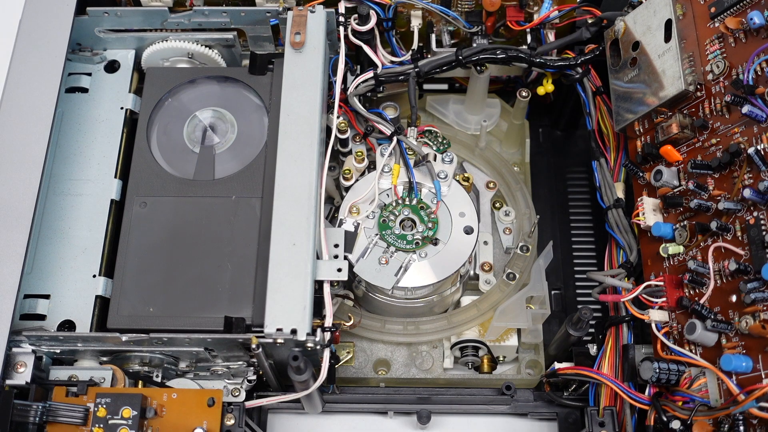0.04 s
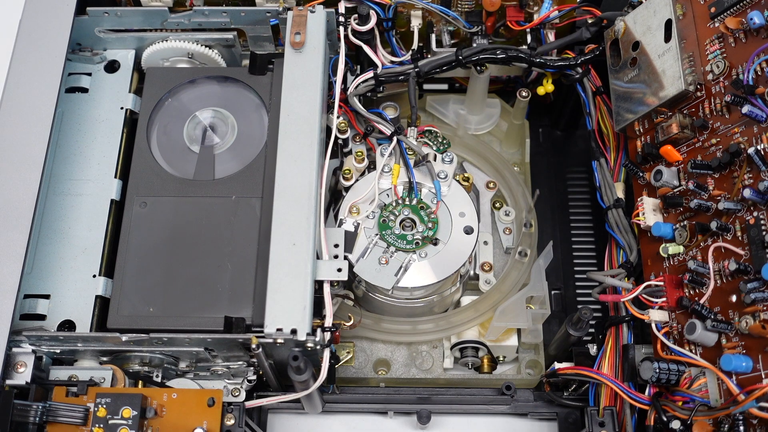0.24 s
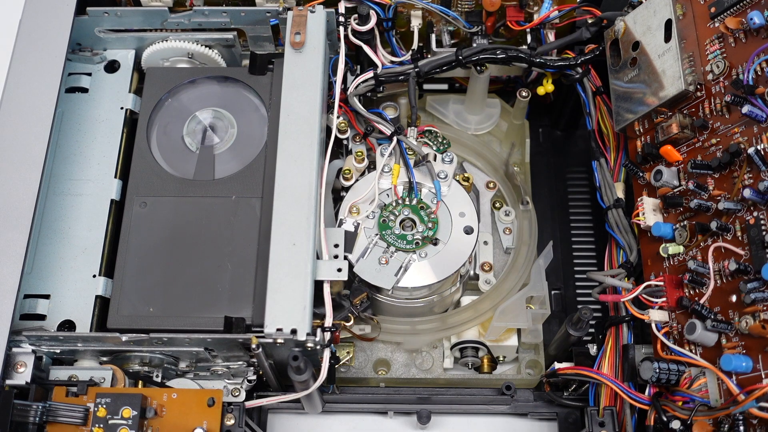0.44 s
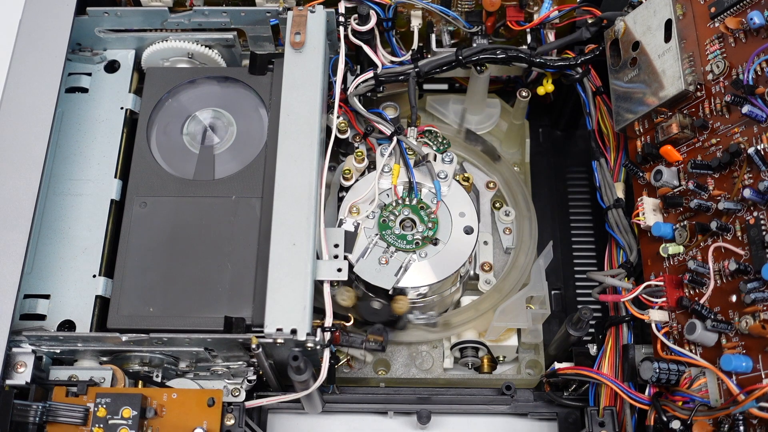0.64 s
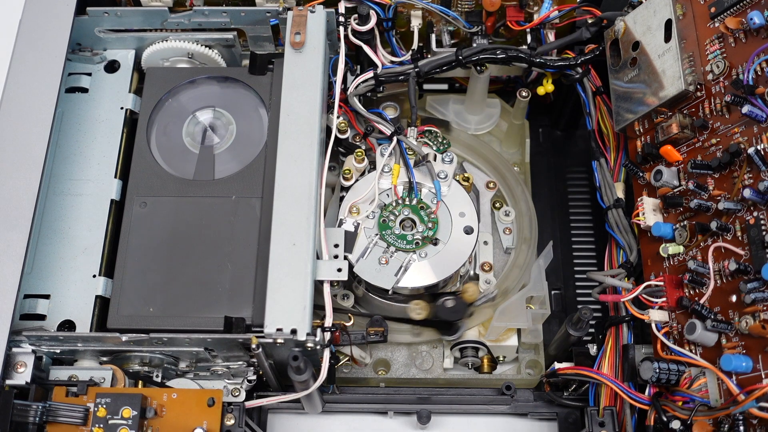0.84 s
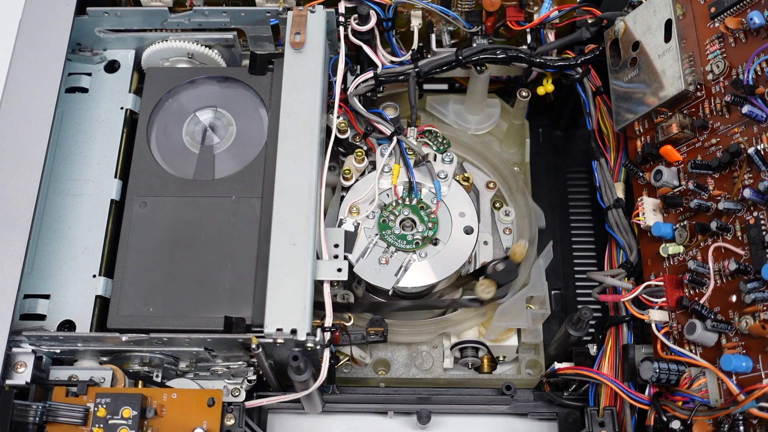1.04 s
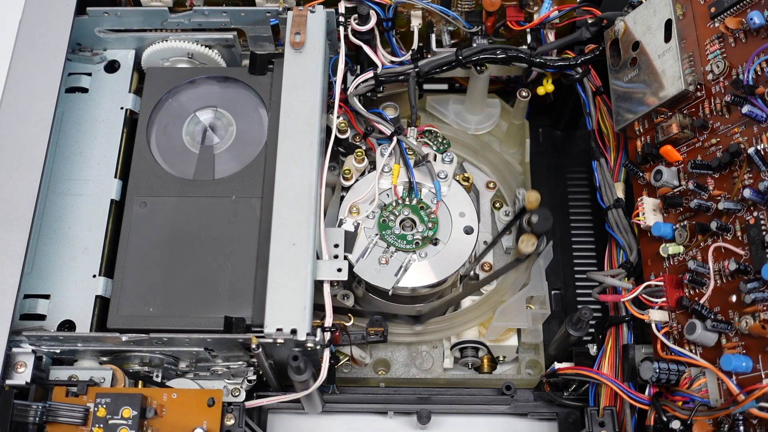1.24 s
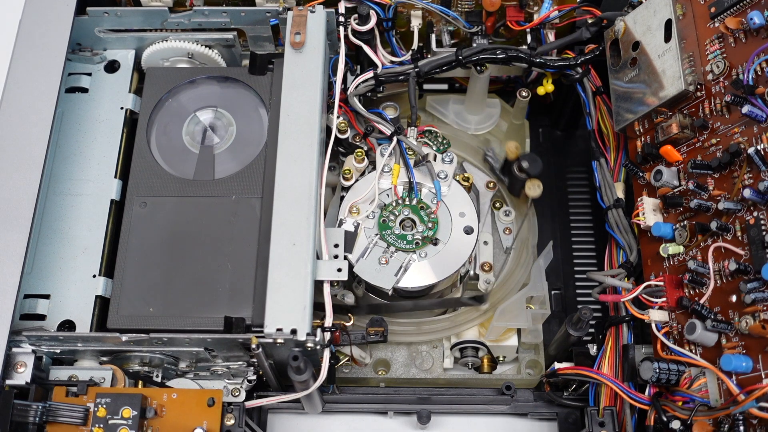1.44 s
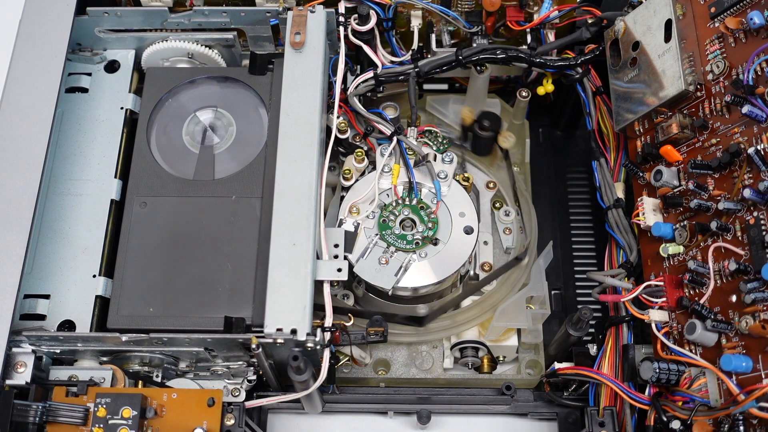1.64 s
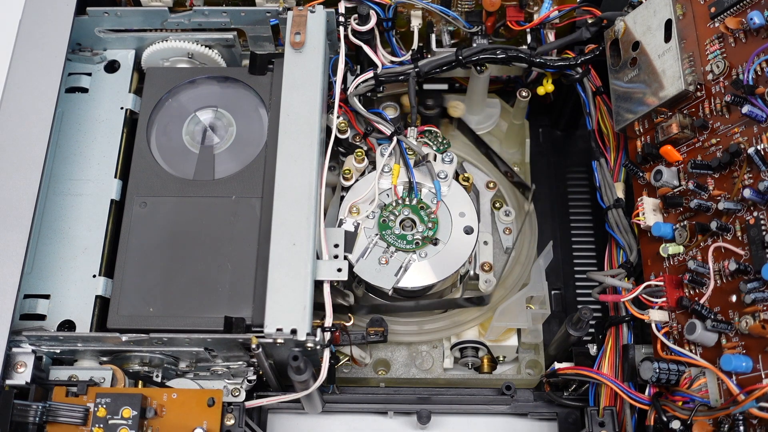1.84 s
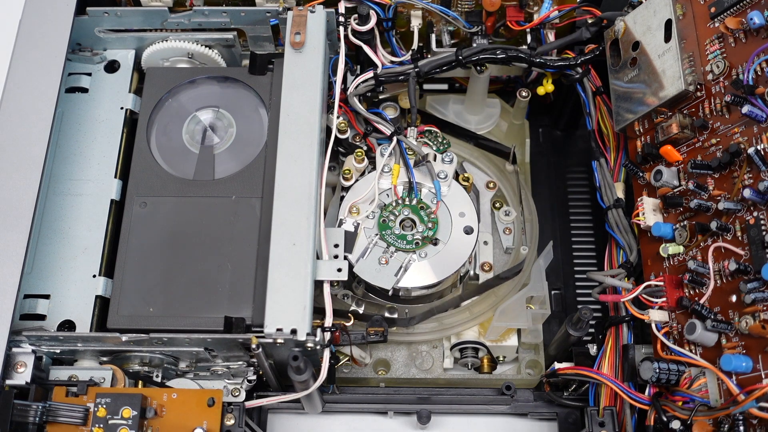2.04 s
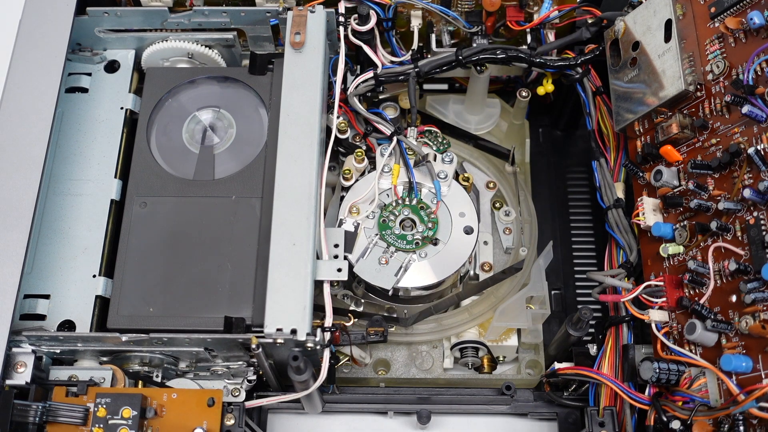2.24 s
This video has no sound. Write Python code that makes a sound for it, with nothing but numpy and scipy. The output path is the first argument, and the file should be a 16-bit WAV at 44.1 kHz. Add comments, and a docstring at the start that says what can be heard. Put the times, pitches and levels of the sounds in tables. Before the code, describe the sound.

A small motor whirs, rattles and clicks as a video recorder threads its tape.

```python
"""A video recorder threads its tape

Heard from close above the open case, a small motor and a slower belt-driven gear shaft whir at
harmonics of their rotation rates. The loading ring rattles round and levers click, exciting the
resonances of the chassis. The guides latch, the motor stops, and the head drum hums on under a
thin, steady electronic whistle."""
import sys
import numpy as np
from scipy import signal
from scipy.fft import rfft, irfft
from scipy.io import wavfile

SR = 44100
rng = np.random.default_rng(int(sys.argv[2]) if len(sys.argv) > 2 else 0)


def digitize_waveform(pressure):
    """Quantize a signal to 16-bit integers and store it at the path in sys.argv[1].

    Rows of a 2-D input are taken as channels; values are limited to [-1, 1].
    """
    field = np.atleast_2d(pressure).T
    bounded = np.clip(field, -1, 1)
    quanta = np.round(bounded * 32767).astype(np.int16)
    wavfile.write(sys.argv[1], SR, quanta)


N = 105840
TIME = np.arange(N) / SR
START_S, STOP_S = .155, 2.11  # motor on, motor off


def amp(db):
    """Amplitude ratio of a level in decibels."""
    return 10 ** (np.asarray(db) / 20)

def unit(x):
    """Normalisation to rms 1."""
    return x / np.sqrt(np.mean(abs(x) ** 2) + 1e-20)

def curve(points):
    """Linear interpolation in time."""
    return np.interp(TIME, *np.transpose(points))

def spectrum(points, hz):
    """Interpolation of level over log frequency."""
    f, db = np.transpose(points)
    return np.interp(np.log(hz + 1), np.log(f + 1), db)

def add(mix, s, sound):
    """Superposition of a sound starting at s seconds."""
    part = mix[max(round(s * SR), 0):][:len(sound)]
    part += sound[:len(part)]

def drift(hz):
    """Random fluctuation: low-pass noise of rms 1."""
    f = np.fft.rfftfreq(N, 1 / SR)
    return unit(irfft(rfft(rng.standard_normal(N)) / (1 + (f / hz) ** 4), N))

def colour(x, db_at, size=4096):
    """Minimum-phase filter with the gain db_at(f)."""
    log_gain = np.log(amp(db_at(abs(np.fft.fftfreq(size, 1 / SR)))))
    taps = np.fft.ifft(np.exp(np.conj(signal.hilbert(log_gain)))).real
    return signal.fftconvolve(x, taps)[:len(x)]

def noise(points):
    """Gaussian noise of a given spectral shape, rms 1."""
    return unit(colour(rng.standard_normal(N), lambda f: spectrum(points, f)))

def resonate(x, hz, width_hz):
    """Forced response of two equal resonators in cascade, rms 1."""
    r = np.exp(-np.pi * abs(width_hz) / SR)
    pole = [1, -r * np.exp(2j * np.pi * hz / SR)]
    return unit(signal.lfilter([1 - r], pole, signal.lfilter([1 - r], pole, x)).real)


# room noise spectrum (f/Hz, relative level/dB)
ROOM = [(18, -51), (30, -31), (145, 1), (411, -1.5), (503, -0.5), (1160, -2.5), (2430, -7.5),
        (13000, -19.5)]

def room():
    """Ambient noise: faint, stationary and broadband."""
    return amp(-80.5) * noise(ROOM)


# envelope of the running mechanism (t/s, level/dB)
EFFORT = [(0,-60),(.14,-49),(.175,-21),(.205,-4.5),(.25,0),(.33,-1.5),(.42,-0.5),(.62,-0.5),(.9,0.5),(1.1,.5),(1.35,-.7),(1.6,-0.7),(1.85,0.5),(1.97,0),(2.07,2),(2.11,-5.5),(2.16,-9),(2.21,-14),(2.3,-17.5),(2.4,-24)]

def effort():
    """Amplitude envelope: the mechanism starts, runs and dies away."""
    return amp(curve(EFFORT))


# envelope of the whistle (t/s, gain/dB)
WHISTLE_SWELL = [(0,-8.5),(.3,0),(1,2.5),(1.9,2),(2.15,3),(2.4,8)]

def whistle(line_hz=15690, interaural_rad=2.94):
    """A tone at the picture line rate; random modulation deepens while parts move."""
    moving = .25 + np.minimum(effort(), 1)
    ears = []
    for db, depth, lag in ((-64, .3, 0), (-56.5, .1, interaural_rad)):
        waver = 1 + depth * moving * (drift(6.9) + 1j * drift(30))
        carrier = np.exp(1j * (2 * np.pi * line_hz * TIME - lag))
        ears.append(amp(db + curve(WHISTLE_SWELL)) * np.sqrt(2) * (waver * carrier).real)
    return np.array(ears)


# tones of the head drum (f/Hz, bandwidth/Hz, level/dB)
DRUM_TONES = [(274.4,35,-75.5),(915,74,-70),(1166,25.7,-65.5),(2710,40,-68),(6210,90,-80),(7000,35,-80),(8670,130,-70),(10500,60,-78)]
# spectrum of the air round it (f/Hz, relative level/dB)
DRUM_AIR = [(35, -76), (60, -42), (269, -18.5), (619, -33.5), (1150, 2.5), (1790, -26.5), (2470, -29),
            (2780, 4.5), (3050, -23.5), (8820, -16), (15000, -22)]

def head_drum(rise_s=.8):
    """Narrow-band hum and air noise grow as the drum spins up, then hold."""
    tones = sum(amp(db) * resonate(rng.standard_normal(N), hz, width) for hz, width, db in DRUM_TONES)
    air = amp(-63) * noise(DRUM_AIR)
    return np.clip((TIME - START_S) / rise_s, 0, 1) * (tones + air)


# blows on the case (t/s, gain/dB)
THUMPS = [(2.06,-55),(2.117,-58),(2.226,-64.5)]
# modes of the case (f/Hz, bandwidth/Hz, level/dB, T60/s)
CASE_MODES = [(131,50,-5.5,0.21),(200,60,-1.5,.2),(271.5,53,-2.5,0.36),(364,78,-1.5,0.43),(654,95,-1.5,0.32),(1012,140,3,.35)]

def thumps():
    """Modal decay: the case rumbles briefly as the guides seat."""
    out = np.zeros(N)
    for s, gain_db in THUMPS:
        ring = sum(amp(db - 60 * TIME / t60) * resonate(rng.standard_normal(N), hz, width)
                   for hz, width, db, t60 in CASE_MODES)
        add(out, s, amp(gain_db) * ring)
    return out


# friction spectrum (f/Hz, relative level/dB)
FRICTION = [(40,-44),(110,-16),(300,-3),(480,-7),(750,4.5),(1500,1),(3000,0),(5000,1),(7500,-2),(11000,-1.5),(13500,-11),(16000,-17.5)]
# scrapes (centre t/s, half length/s, level/dB, squeak f/Hz, relative squeak level/dB)
SCRAPES = [(.209,0.0029,-40,4350,8),(.994,.004,-39.5,2170,7),(1.254,.003,-49,9440,5),(1.762,0.0034,-34.5,8760,3),(2.2015,0.0025,-49,1250,13),(2.228,0.0086,-45.5,7520,-13),(2.266,0.0063,-55,1390,7)]

def scrapes():
    """Sliding friction: noise and a resonant squeak swell and fade in a Gaussian envelope."""
    out = np.zeros(N)
    for s, half_s, db, squeak_hz, squeak_db in SCRAPES:
        rub = noise(FRICTION)
        squeak = amp(squeak_db) * resonate(rng.standard_normal(N), squeak_hz, width_hz=550)
        out += amp(db) * unit(rub + squeak) * np.exp(-.5 * ((TIME - s) / half_s) ** 2)
    return out


# peaks and dips of the chassis response (f/Hz, bandwidth/Hz, gain/dB)
CHASSIS = [(880,50,-0.5),(1062,48,4),(1183,49,-0.5),(1330,100,0.5),(1537,50,5.5),(1727,57,5.5),(2145,30,5),(2460,26,1.5),(2710,95,3.5),(3240,50,0.5),(6010,48,0.5),(8720,290,3.5),(10840,190,2),(13400,200,-18)]

def chassis(force, shape, size=4096):
    """Source and filter: chassis resonances colour a force given a spectral shape; rms 1."""
    def response_db(f):
        lift = sum(db / (1 + (2 * (f - hz) / width) ** 2) for hz, width, db in CHASSIS)
        return spectrum(shape, f) + lift
    return unit(colour(force, response_db, size))


# low, middle and high spectra of an impact (f/Hz, relative level/dB)
KNOCK = [(40,-62),(120,-25.5),(300,-22.5),(470,-18),(650,-4),(1080,-0.5),(1300,-5.5),(1800,-28.5)]
CLACK = [(500,-35),(1100,-18.5),(1500,0),(3000,0),(5500,-3.5),(7500,-27.5)]
SNAP = [(3500,-34.5),(6300,6),(11000,-1),(13000,-9),(16000,-14)]
# lever and guide impacts; knock, snap and ring are relative to the clack
# (t/s, level/dB, knock/dB, snap/dB, rise/s, T60/s, ring f/Hz, ring/dB)
CLICKS = [(0.2049, -40.5, -4, -8, 0.0005, 0.11, 4440, -4.5),
          (0.2237, -42.5, -6, -5, 0.0074, 0.09, 1710, -16),
          (0.2626, -38.5, -10, -11, 0.0014, 0.061, 2905, -4.5),
          (0.2966, -41.5, 5.5, 0.5, 0.0033, 0.033, 870, 1),
          (0.3474, -41.5, -4, -1, 0.001, 0.086, 1760, -12),
          (0.4743, -41, -2.5, -15, 0.001, 0.093, 1540, -3.5),
          (0.4815, -49, 0, 1.5, 0.0014, 0.031, 1040, -1),
          (0.5253, -43.2, -1, 2.5, 0.0025, 0.047, 6780, -1.5),
          (0.5438, -40.5, -7, -9, 0.00055, 0.065, 1750, -19),
          (0.6214, -39, -6.5, -4.5, 0.0006, 0.086, 1660, -11),
          (0.6526, -44.5, 0.5, 2.5, 0.0007, 0.036, 1620, 0.5),
          (0.6642, -41.5, -2.5, 0.5, 0.004, 0.051, 1734, -12),
          (0.672, -41.5, -17, -4, 0.0038, 0.014, 1730, -19), (0.7068, -54, 8.5, 3, 0.0006, 0.076, 1096, 0),
          (0.7304, -42.5, -5.5, -4, 0.0025, 0.038, 1173, -10),
          (0.767, -44.5, 1, -2, 0.0013, 0.33, 1720, -15), (0.7885, -47, -10, 4, 0.00065, 0.029, 2700, 4),
          (0.8526, -41.3, -6, 1, 0.0034, 0.035, 2708, -9),
          (0.9874, -35.5, -12, -3.5, 0.0004, 0.17, 1704, -7),
          (1.0041, -57, 9, -5, 0.0011, 0.059, 1090, -12), (1.2904, -41.5, -5, -2, 0.0012, 0.064, 1545, -6),
          (1.714, -30.5, -13.5, -7, 0.00076, 0.042, 1703, -4),
          (1.8743, -42, -8, -3, 0.0008, 0.055, 5800, -1),
          (1.9112, -32.5, -13.5, -5.5, 0.0023, 0.036, 4550, 3),
          (1.9183, -29, -24, -5, 0.0013, 0.029, 4495, -5.5),
          (1.9802, -48, -15, -1, 0.0008, 0.023, 1780, 9.5),
          (1.9856, -39.5, -5, -6.5, 0.0015, 0.065, 1720, -7),
          (2.0168, -38, -12, -12, 0.0022, 0.026, 1745, -10),
          (2.0272, -42, -14.5, -19, 0.0009, 0.049, 1660, -4),
          (2.044, -42.5, -0.5, -5, 0.0011, 0.046, 950, -11),
          (2.0577, -30.5, -9.5, -8, 0.0021, 0.022, 1010, -13),
          (2.0621, -42.5, 11.5, 1, 0.00059, 0.046, 1009, 9),
          (2.1078, -34.5, -1.5, -2.5, 0.0063, 0.054, 1093, -14),
          (2.1163, -32.5, -6, 1.5, 0.00057, 0.019, 1030, -6.5)]

def clicks(size=12000, span_s=.0081, ring_split=.023, tail_db=-27.5, tail_t60=.27):
    """Impact excitation: the chassis clatters and the striking part rings in two beating modes."""
    out, t = np.zeros(N), np.arange(size) / SR
    spread = np.sqrt(span_s * SR / size)  # a level is the energy spread over span_s
    for s, db, knock_db, snap_db, rise_s, t60, hz, ring_db in CLICKS:
        decay = amp(-60 * t / t60) + amp(tail_db - 60 * t / tail_t60)
        envelope = (1 - np.exp(-t / rise_s)) * decay
        burst = rng.standard_normal(size) * envelope
        clatter = sum(amp(band_db) * chassis(burst, band, size=2048)
                      for band, band_db in ((KNOCK, knock_db), (CLACK, 0), (SNAP, snap_db)))
        upper_mode = .5 * np.sin(2 * np.pi * (hz * (1 + ring_split) * t + rng.random()))
        ring = envelope * (np.sin(2 * np.pi * hz * t) + upper_mode)
        add(out, s, amp(db) * spread * (clatter + amp(ring_db) * unit(ring)))
    return out


# low tones of the shafts (f/motor rate, level/dB)
HUM = [(.652,-86),(1,-75.5),(1.304,-72.5),(1.956,-74.5),(3,-79),(3.912,-78.5),(5.216,-77.5)]
# envelopes of that hum and of the worm gear's tone (t/s, gain/dB)
HUM_SWELL = [(.2,-5.5),(.6,-5.5),(1,3.5),(1.25,-4.5),(1.5,1.5),(1.9,-2.5)]
WORM_SWELL = [(.2,-70),(.35,-64.5),(.85,-60.5),(1.1,-72.5),(2,-69)]

def hum(turns, worm_order=6):
    """Rotational tones: shafts and worm gear hum at fixed ratios to the motor rate."""
    shafts = sum(amp(db + 3.7 * drift(10)) * np.cos(2 * np.pi * (k * turns + rng.random()))
                 for k, db in HUM)
    worm = np.cos(2 * np.pi * worm_order * turns)
    return np.sqrt(2) * (amp(curve(HUM_SWELL)) * shafts + amp(curve(WORM_SWELL)) * worm)


# resonances of the motor (f/Hz, bandwidth/Hz, level/dB)
WHINE = [(3210,48,-61.5),(3320,40,-65),(4000,54,-64),(5895,46,-61),(6140,49,-67),(6800,30,-65.5),(11300,220,-72),(13300,200,-80)]
# envelope of the whine (t/s, gain/dB)
WHINE_SWELL = [(.2,-9),(.9,-3.5),(1.3,1),(1.7,0.5),(2.1,-6)]

def whine(rub):
    """Forced resonance: rubbing makes the motor whine in narrow bands."""
    return amp(curve(WHINE_SWELL)) * sum(amp(db) * resonate(rub, hz, width) for hz, width, db in WHINE)


# harmonics of the motor and of the gear shaft (f/own rotation rate, relative level/dB)
MOTOR_ORDERS = [(7,-12.5),(8,-11.5),(9,-10.5),(10,-3.5),(11,-9.5),(12,-3.5),(13,-8),(15,-3),(16,-3),(17,-4.5),(18,2.5),(19,-1),(22,-13),(26,-5),(28,-10.5),(29,-9.5)]
GEAR_ORDERS = [(12,-13),(14,-5),(16,-6),(17,2.5),(19,4),(20,-9.5),(23,-7),(29,-9)]

def shaft(turns, orders, waver_db=1, waver_hz=14):
    """Harmonics phase-locked to a turning shaft, each wavering in level."""
    return unit(sum(amp(db + waver_db * drift(waver_hz)) * np.cos(2 * np.pi * (k * turns + rng.random()))
                    for k, db in orders))


# running rotation rate of the motor (t/s, f/Hz)
MOTOR_RATE = [(0.22, 101.8), (0.234, 97), (0.318, 94), (0.416, 90.6), (0.504, 96.7), (0.706, 95),
              (0.826, 100), (0.95, 95.3), (0.99, 98.7), (1.266, 97.5), (1.312, 96.0), (1.41, 99),
              (1.54, 96.5), (1.648, 98), (1.94, 95.3), (2.08, 98.0)]
# spectrum of the rubbing, rattling gears (f/Hz, relative level/dB)
RATTLE = [(24, -55), (40, -36), (119, -17), (191, -15), (233, -19.5), (373, -20.5), (541, -19.5),
          (582, -11), (824, -10.5), (980, -5.5), (1230, -2.5), (1350, -14.5), (1780, -5), (2010, -7),
          (5290, -9.5), (5990, -12.5), (15000, -27)]

def drive(gear_ratio=.652, spin_up_s=.02, coast_s=.15, tone_decay_s=.05, flutter=.0032,
          grains_per_s=2500, pulse_depth=.32):
    """Rotating machinery: shaft harmonics, plus friction noise modulated once per motor turn."""
    since_start, since_stop = np.maximum(TIME - START_S, 0), np.maximum(TIME - STOP_S, 0)
    run = (1 - np.exp(-since_start / spin_up_s)) * np.exp(-since_stop / coast_s)
    turns = np.cumsum(curve(MOTOR_RATE) * run * (1 + flutter * drift(27.7))) / SR
    grains = (rng.random(N) < grains_per_s / SR) * rng.standard_normal(N)
    pulse = 1 + pulse_depth * unit(np.exp(-(turns % 1) / .16))
    rub = (.6 * unit(grains) + rng.standard_normal(N)) * pulse
    rattle = amp(-46.5) * chassis(rub, RATTLE)
    motor = whine(rub) + amp(-48) * shaft(turns, MOTOR_ORDERS)
    gear = amp(-55.5) * shaft(turns * gear_ratio, GEAR_ORDERS)
    tones = (motor + gear + hum(turns)) * np.exp(-since_stop / tone_decay_s)
    return effort() * (rattle + tones)


# left-right difference of the reflections (f/Hz, gain/dB)
SIDE = [(60,-29),(250,-14.5),(900,-20.5),(3000,-16),(12000,-16.5)]

def reflections(x, size=6000, t60=.12, rise_s=.0047):
    """Interaural decorrelation: reflections from the open case differ a little at each ear."""
    t = np.arange(size) / SR
    taps = rng.standard_normal(size) * amp(-60 * t / t60) * np.minimum(t / rise_s, 1) ** 2
    reflected = signal.fftconvolve(x, taps / np.linalg.norm(taps))[:N]
    side = colour(reflected, lambda f: spectrum(SIDE, f))
    return np.array([x + side, x - side])

def scene():
    """Superposition of the machine's sources and the quiet room, in stereo."""
    return reflections(room() + drive() + clicks() + scrapes() + thumps() + head_drum()) + whistle()

def record(dry):
    """Band limiting by a linear-phase low-pass at 16.3 kHz."""
    taps = signal.firwin(511, 16300, window=("kaiser", 9), fs=SR)
    return signal.oaconvolve(dry, taps[None], "same")


dry = scene()
out = record(dry)
digitize_waveform(out)
```